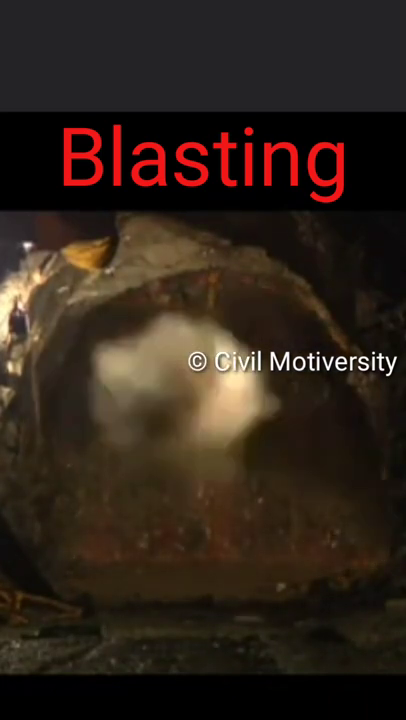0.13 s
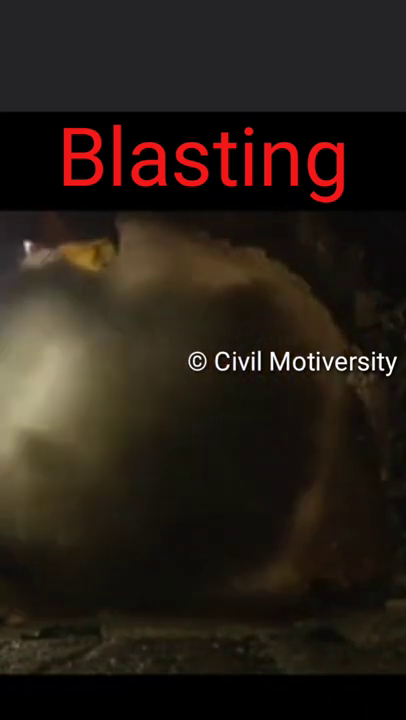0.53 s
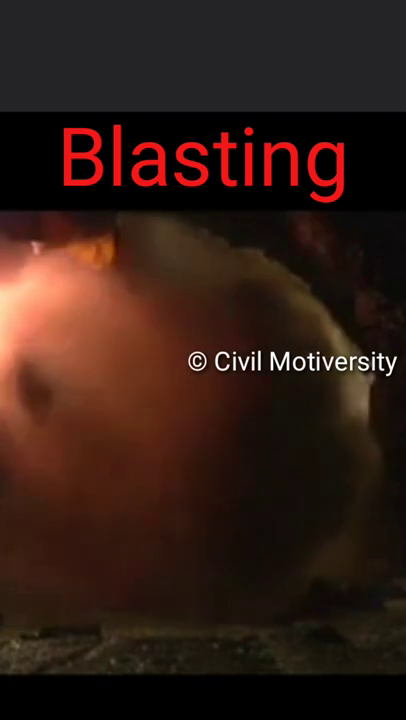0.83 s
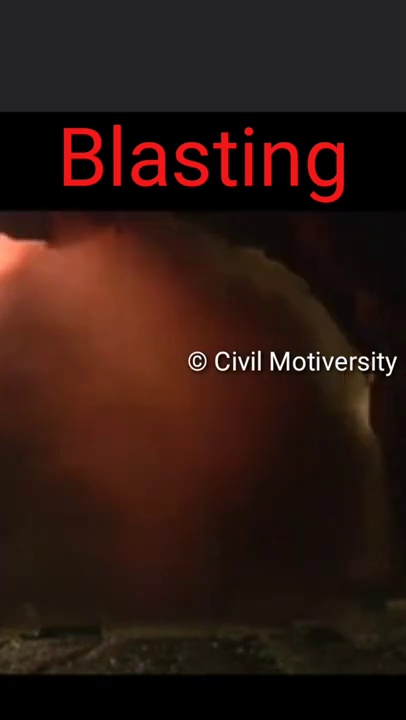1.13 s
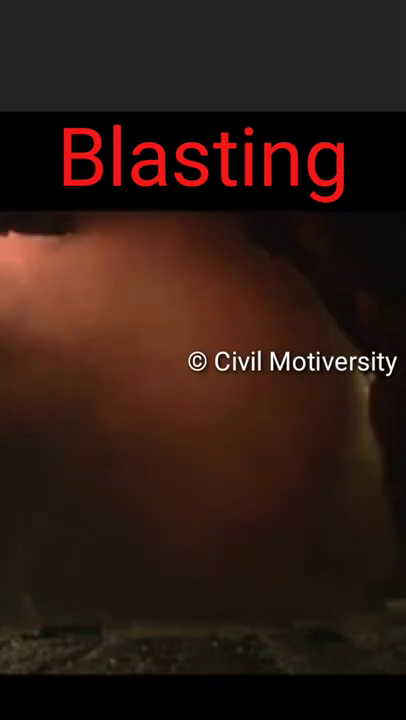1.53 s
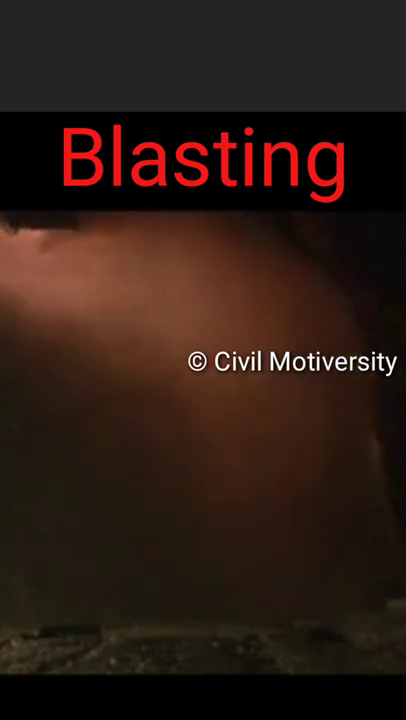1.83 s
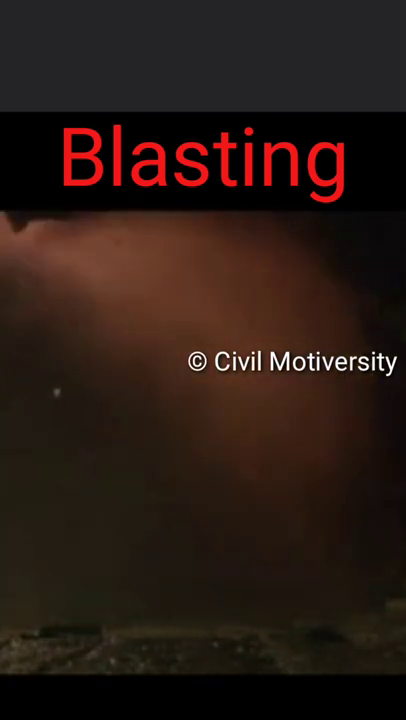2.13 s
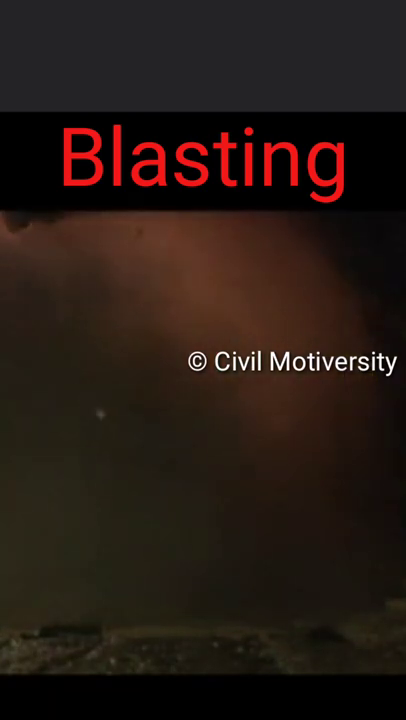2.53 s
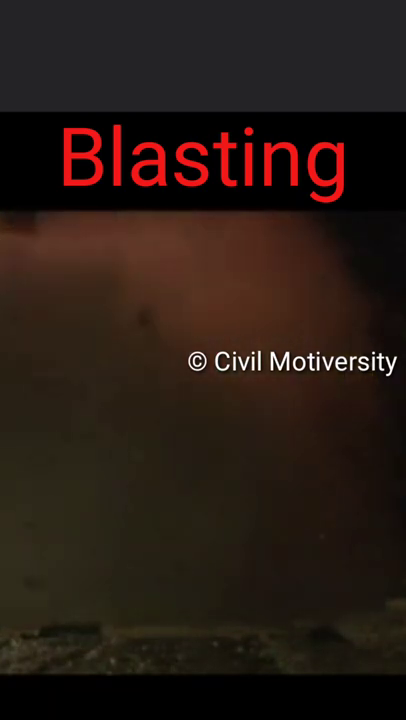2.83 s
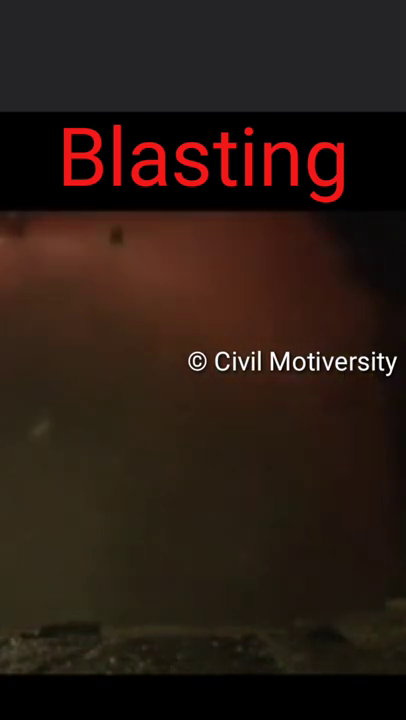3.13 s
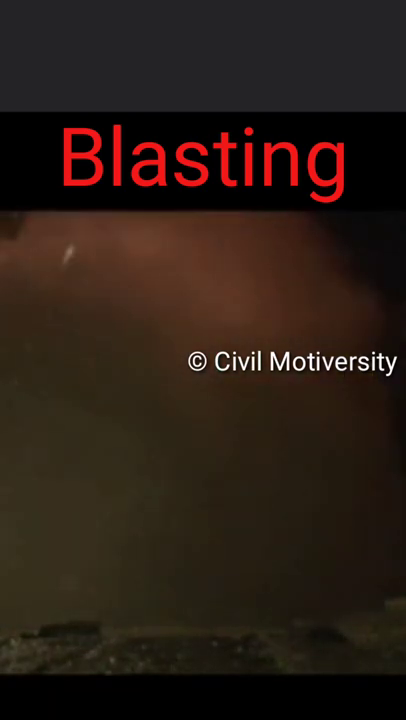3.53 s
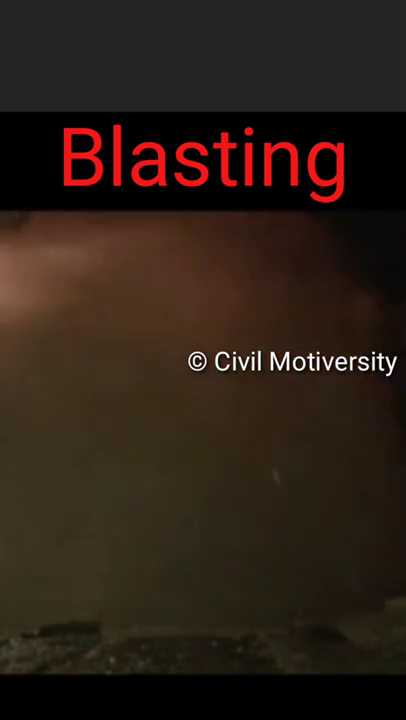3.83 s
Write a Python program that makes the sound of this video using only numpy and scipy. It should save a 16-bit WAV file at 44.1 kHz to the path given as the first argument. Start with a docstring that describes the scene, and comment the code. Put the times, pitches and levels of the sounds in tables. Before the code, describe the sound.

A loud, distorted rock blast in a tunnel, rumbling away with thuds of falling rock.

```python
"""A ventilation fan drones in a rock tunnel; something squeaks faintly and a dull rumble swells in the rock.
Then eight charges fire in quick succession, each with a crack and a heave of air. The pressure waves
overload the microphone, which flattens their peaks into a rasping rumble. Rock snaps, slides and thuds
down while waves of air run up and down the tunnel. The air keeps buffeting as it calms, and a few
jolts, most of them late, make the microphone click."""
import sys
import numpy as np
from scipy import signal
from scipy.fft import rfft, irfft
from scipy.io import wavfile
from scipy.ndimage import uniform_filter1d

SR = 44100
rng = np.random.default_rng(int(sys.argv[2]) if len(sys.argv) > 2 else 0)


def wrap_up_sound(samples):
    """Save the sound to the file named by the first command line argument, as 16-bit audio."""
    columns = np.atleast_2d(samples).T
    # keep every value between -1 and 1, then stretch to whole-number steps
    tamed = np.clip(columns, -1, 1)
    steps = np.round(tamed * 32767).astype(np.int16)
    wavfile.write(sys.argv[1], SR, steps)


N = 176400
T = np.arange(N) / SR
BLAST_S = .36  # the microphone overloads at a pressure of about 1, or 0 dB

# The explosions: start_s, crack_db, crack_rise_s, crack_decay_s, push_db
CHARGES = [(0.333, -7, 0.0058, 0.017, -19), (0.359, -11, 0.0023, 0.0057, 21.5),
           (.383, 2, 0.013, 0.014, -19.5), (0.404, -1.5, 0.01, 0.015, 12), (.431, -5.5, 0.0049, 0.0065, 21),
           (0.462, -8.5, 0.0034, 0.02, 3), (0.512, 8, 0.0025, 0.0068, 8), (0.538, -7, 0.0028, 0.014, 11.5)]
# How strongly the air surges in the tunnel: time_s, level_db
SURGE_LEVEL = [(.33, -48.5), (.392, -20), (.415, 14.5), (.45, 7), (.54, 14.5), (.6, 8), (.67, 11.5),
               (.72, 6.5), (.8, 11), (1.05, 12), (1.25, 6), (1.35, 6), (1.45, 11), (1.55, 6), (1.74, 0.5),
               (2.1, 2), (2.2, -3), (2.5, -4), (2.7, -7), (3.1, -8.5), (3.3, -8), (3.55, -5.5), (4, -8.5)]
# Heavy blocks landing: time_s, level_db
ROCK_FALLS = [(.440, 22), (.461, 17.5), (0.473, 13.5), (.517, 21), (.541, 16), (0.58, 18), (0.735, 20),
              (0.781, 15.5), (.822, 22.5), (.865, 16.5), (.918, 12.5), (.949, 13), (0.985, 13.5),
              (1.005, 12), (1.035, 16), (1.085, 16), (1.188, 9.5), (1.242, 11), (1.331, 11.5), (1.397, 7.5),
              (1.454, 9.5), (1.592, 7), (1.78, 9.5), (1.828, 7.5), (1.892, 11.5), (1.978, 2), (2.016, 4.5),
              (2.081, 5), (2.12, 6), (2.291, 2.5), (2.689, -0.5), (2.776, 3.5), (2.903, 3.5), (3.026, 4),
              (3.14, 0), (3.421, -1), (3.538, 1.5), (3.804, 0.5)]
# Jolts of the microphone: start_s, click_width_s, click_height (1 is the overload point)
JOLTS = [(0.4361, .0007, 1.87), (2.2126, .00012, 1.28), (2.457, 0.0013, 1.16), (3.4768, 0.000913, 0.85),
         (3.6675, 0.0002, 1.07)]
# The tone of splitting rock: pitch_hz, level_db
CRACK_TONE = [(100, 0), (300, 3), (1200, -6.5), (3300, -15), (6000, -28.5), (10000, -37)]
# The tone of tumbling rock: pitch_hz, level_db
ROAR_TONE = [(100, -5), (250, 4.5), (500, 0.5), (1000, -12), (2000, -22), (4000, -42.5), (9000, -43.5)]
# The bright tone of snaps and rattles: pitch_hz, level_db
SNAP_TONE = [(400, 4.5), (1800, 0.5), (4500, -6), (10000, -14.5)]


def charges():
    """Each charge gives a crack of splitting rock and a slow heave of air."""
    cracks, pushes = np.zeros(N), np.zeros(N)
    push_s = .0055
    for start_s, crack_db, rise_s, decay_s, push_db in CHARGES:
        age = np.maximum(T - start_s, 0)
        cracks += amp(crack_db) * np.minimum(age / rise_s, 1) * np.exp(-age / decay_s)
        progress = age / push_s
        pushes += amp(push_db) * progress * (2 - progress) * np.exp(-progress)  # a push, then a suck
    return cracks * noise(CRACK_TONE) + pushes


def surge():
    """The air in the tunnel rumbles, with the uneven roar of tumbling rock above it."""
    # The deep tone of the surging air: pitch_hz, level_db
    rumble_tone = [(12, -15), (28, -5.5), (50, -1), (75, -1), (120, -11), (200, -21), (400, -32),
                   (900, -54.5)]
    surge_db = curve(SURGE_LEVEL)
    roar = noise(ROAR_TONE) * amp(-24 + .97 * surge_db + 1.5 * wander(rate_hz=22))
    rumble = noise(rumble_tone) * amp(surge_db - 3)
    return ramp(SURGE_LEVEL[0][0], rise_s=.027) * (rumble + roar)


def buffets():
    """Waves of air run up and down the tunnel at uneven intervals, slowing as they weaken."""
    waves, time_s = np.zeros(N), BLAST_S + .05
    for gap, size, length in rng.standard_normal((260, 3)):
        time_s += np.exp(.32 * gap) * wave_gap_s(time_s)
        if time_s < T[-1]:
            near = slice(max(round((time_s - .03) * SR), 0), round((time_s + .03) * SR))
            offset = (T[near] - time_s) / wave_gap_s(time_s)  # slower waves are also longer
            front = np.tanh(offset / .083)
            outline = np.exp(-(offset / (.21 * np.exp(.2 * length))) ** 2 / 2)
            waves[near] += amp(2.8 * size) * front * outline
    return waves * amp(6 + .67 * curve(SURGE_LEVEL))


def thuds():
    """Big blocks land, each with a short crack and one wave: a suck, a steep front and a push."""
    waves, cracks = np.zeros(N), np.zeros(N)
    for time_s, level_db in ROCK_FALLS:
        gap_s = wave_gap_s(time_s)
        front = np.tanh((T - time_s) / (.05 * gap_s))
        waves += amp(level_db) * front * bump(time_s, .3 * gap_s)
        cracks += amp(level_db - 24.5) * bump(time_s, half_length_s=.003)
    return waves + cracks * noise(CRACK_TONE)


def wave_gap_s(time_s):
    """The usual time between echoing waves of air, which grows as they slow."""
    # How often the waves arrive: time_s, waves_per_s
    wave_rate = [(1.0, 70), (2.0, 56), (2.8, 46), (4, 43)]
    return 1 / np.interp(time_s, *np.transpose(wave_rate))


def lulls():
    """A gain that makes the churning air drop away between gusts and give way to each thud or jolt."""
    # Calm moments between gusts: time_s, half_length_s
    pauses = [(1.314, 0.0051), (1.773, 0.0046), (1.865, 0.005), (2.157, 0.0071), (2.321, 0.01),
              (2.614, 0.006), (2.797, 0.0092), (3.35, 0.0088), (3.831, 0.0071)]
    calm = sum(bump(time_s, half_length_s) for time_s, half_length_s in pauses)
    calm += sum(bump(time_s, half_length_s=.011) ** 2 for time_s, *_ in ROCK_FALLS + JOLTS)
    return 1 - (1 - amp(-18)) * np.minimum(calm, 1)


def slides():
    """Broken rock pours down in short rushes."""
    # Rushes of rubble: time_s, level_db, half_length_s
    rushes = [(0.471, 2.5, 0.011), (.522, 9, 0.0025), (0.673, -0.5, 0.019), (0.776, 0.5, 0.012),
              (0.921, -1.5, 0.013), (0.994, -2.5, 0.014), (1.249, -7.5, 0.029), (1.454, -8, 0.025),
              (3.07, -23.5, 0.016), (3.552, -19, 0.018)]
    loudness = sum(amp(db) * bump(time_s, half_length_s) for time_s, db, half_length_s in rushes)
    return loudness * noise(ROAR_TONE)


def snaps():
    """Breaking rock gives dry snaps; one short gritty hiss sounds among them."""
    # Moments when rock breaks: time_s, level_db
    breaks = [(.4252, -13), (0.4894, -13.5), (0.5163, -10), (.613, -16.5), (.755, -14), (0.7802, -11),
              (.7889, -13), (.8222, -14), (.9183, -18), (.949, -17.5), (0.9826, -16), (1.035, -17),
              (1.0894, -16), (1.329, -19), (1.345, -22), (1.4553, -16), (1.892, -18.5), (3.027, -21)]
    ticks = sum(amp(db) * np.exp(-abs(T - time_s) / .0004) for time_s, db in breaks)
    grit = amp(-29.5) * bump(1.654, half_length_s=.017)
    return (ticks + grit) * noise(SNAP_TONE)


def jolts():
    """Short sucks between two shoves of air pin the microphone at its limit."""
    half_length_s = .005
    shapes = sum((1 - ((T - s) / half_length_s) ** 2) * bump(s, half_length_s) for s, _, _ in JOLTS)
    return -amp(6.5) * shapes


def clicks():
    """At each jolt the microphone snaps back for an instant (the longer, the hollower) and rattles."""
    pulses, rattle = np.zeros(N), np.zeros(N)
    for start_s, width_s, height in JOLTS:
        age = T - start_s
        pulses += height * np.clip(age * SR, 0, 1) * np.clip((width_s - age) * SR, 0, 1)
        rattle += height * (age > 0) * np.exp(-abs(age) / .0034)
    return pulses + amp(-22) * rattle * noise(SNAP_TONE)


def crunch():
    """The overloaded microphone fizzes and crackles; the crackle softens once the blast has passed."""
    # The tone of the crackle: pitch_hz, level_db
    crackle_tone = [(100, -13.5), (450, -4.5), (1200, -4), (3000, -14), (6000, -24), (10000, -35.5)]
    # The strength of the crackle: time_s, level_db
    crackle_level = [(2.1, -26.5), (2.6, -29.5)]
    # The tone of the fizz: pitch_hz, level_db
    fizz_tone = [(300, 7), (1000, -4.5), (3000, -21), (6000, -28.5), (8500, -24.5), (11000, -46)]
    grains_per_s = 2500
    grains = rng.standard_normal(N) * (rng.random(N) < grains_per_s / SR)
    grains *= amp(2.5 * np.minimum(rng.exponential(1, N), 4))  # a few stand out
    crackle = colour(grains, crackle_tone)
    return amp(curve(crackle_level)) * crackle / crackle.std() + amp(-28) * noise(fizz_tone)


def tremor():
    """The rock carries a dull rumble ahead of the air blast."""
    # The tone of the shaking rock: pitch_hz, level_db
    tremor_tone = [(50, 7.5), (120, 3), (300, -3), (400, -8), (560, -36), (1100, -46)]
    return amp(-16) * bump(.34, half_length_s=.13) * noise(tremor_tone)


def squeak():
    """Something squeaks faintly just before the blast."""
    pitch_hz = 3200
    tone = wander(rate_hz=130) * np.sin(2 * np.pi * pitch_hz * T)
    return amp(-46.5) * bump(.195, half_length_s=.018) * tone


def settling():
    """A soft gritty wash lingers after the blast."""
    # The tone of the wash: pitch_hz, level_db
    wash_tone = [(200, 3), (500, 4), (1000, -6), (2000, -20.5), (4000, -28), (8000, -38)]
    return amp(-41 + wander(rate_hz=22)) * noise(wash_tone) * ramp(BLAST_S, rise_s=.15)


def fan():
    """The ventilation drones on, fainter once the charges fire."""
    # The low tone of the fan: pitch_hz, level_db
    fan_tone = [(20, -24), (40, -6), (60, 1), (115, -0.5), (220, -14), (360, -23), (570, -36.5),
                (1100, -43.5), (3200, -52.5), (6000, -60.5), (10000, -76.5)]
    return noise(fan_tone) * amp(-12.5 - 4.5 * ramp(BLAST_S, rise_s=.083))


def amp(db):
    """Turns decibels into a gain to multiply by."""
    return 10 ** (np.asarray(db) / 20)


def curve(points):
    """Reads a table of (time_s, value) at every sample."""
    return np.interp(T, *np.transpose(points))


def ramp(start_s, rise_s):
    """A straight rise from 0 to 1 that then stays at 1."""
    return np.clip((T - start_s) / rise_s, 0, 1)


def bump(time_s, half_length_s):
    """A smooth bump of height 1, centred on time_s."""
    return np.exp(-np.minimum(((T - time_s) / half_length_s) ** 2 / 2, 50))


def colour(x, tone):
    """Filters x by a table of (pitch_hz, level_db)."""
    hz, db = np.transpose(tone)
    pitches = np.fft.rfftfreq(2 * N, 1 / SR)
    gain = amp(np.interp(np.log(pitches + 1), np.log(hz + 1), db))
    return irfft(rfft(x, 2 * N) * gain)[:N]


def noise(tone):
    """Noise of typical size 1 with the given tone, falling away beyond the table's ends."""
    (low_hz, low_db), (high_hz, high_db) = tone[0], tone[-1]
    x = colour(rng.standard_normal(N), [(low_hz / 10, low_db - 40), *tone, (high_hz * 10, high_db - 80)])
    return x / x.std()


def wander(rate_hz):
    """A random drift of typical size 1, no faster than rate_hz."""
    slow = np.fft.rfftfreq(N, 1 / SR) < rate_hz
    x = irfft(rfft(rng.standard_normal(N)) * slow, N)
    return x / x.std()


def scene():
    """The air pressure that reaches the microphone."""
    opening = fan() + squeak() + tremor()
    blast = charges() + lulls() * (surge() + buffets())
    return (opening + blast + thuds() + slides() + jolts())[None]


def record(dry):
    """The microphone overloads, crackles and clicks; rock snaps and the soft wash are added on top."""
    # The overall volume: time_s, level_db
    volume = [(0, -23.5), (.55, -24), (.58, -29.5), (1.4, -30.5), (2.1, -30.5), (2.4, -31.5), (3.0, -31),
              (3.4, -33.5), (3.7, -36.5), (4, -36)]
    # How the microphone favours lows over highs: pitch_hz, level_db
    microphone_tone = [(30, -1.5), (100, 2), (300, 2), (1000, -2), (3000, -3.5), (6500, -5.5), (8700, -4),
                       (10500, -12)]
    low_cut_hz, high_cut_hz, hold_s = 4.5, 10600, .036
    flattened = np.tanh(dry[0])
    overload = abs(uniform_filter1d(flattened ** 4, size=int(hold_s * SR))) ** .97
    overload *= T > CHARGES[0][0]
    # After the blast a gate turns the weak moments down.
    threshold_db, depth_db = -10, -13
    power = abs(uniform_filter1d(flattened ** 2, size=330))
    weakness = 1 / (1 + (power / amp(threshold_db) ** 2) ** 2)
    gate = amp(depth_db * ramp(BLAST_S, rise_s=.17) * weakness)
    x = gate * flattened + clicks() + snaps() + overload * crunch() + settling()
    x = colour(x * amp(curve(volume)), microphone_tone)
    x = signal.lfilter(*signal.butter(1, low_cut_hz, "high", fs=SR), x)
    x *= np.clip(np.minimum(T, T[-1] - T) / .004, 0, 1)  # fade both ends
    x += amp(-102) * rng.standard_normal(N)  # faint hiss
    high_cut = signal.firwin(101, high_cut_hz, window=("kaiser", 7), fs=SR)
    return signal.oaconvolve(x, high_cut, "same")[None]


dry = scene()
out = record(dry)
wrap_up_sound(out)
```